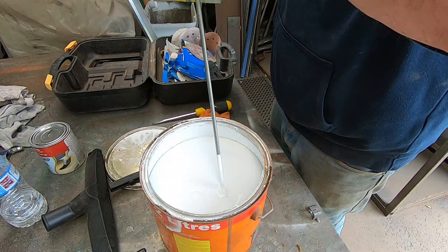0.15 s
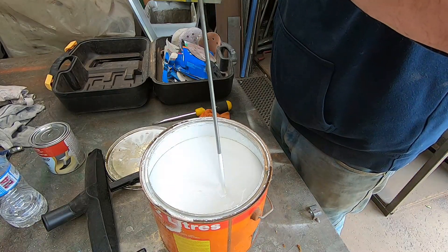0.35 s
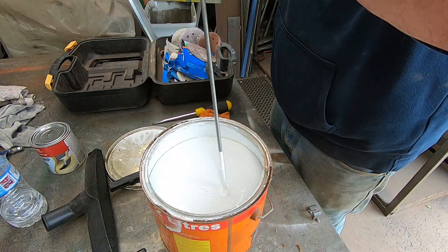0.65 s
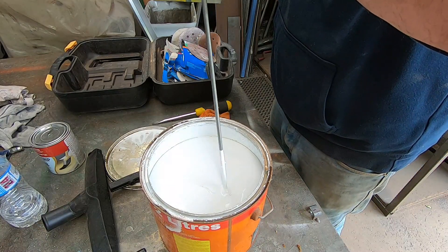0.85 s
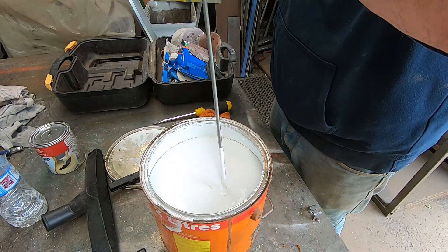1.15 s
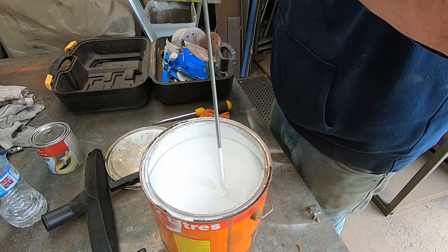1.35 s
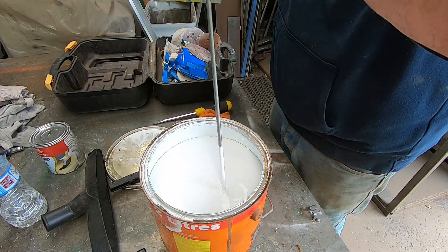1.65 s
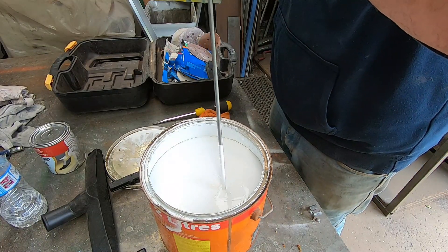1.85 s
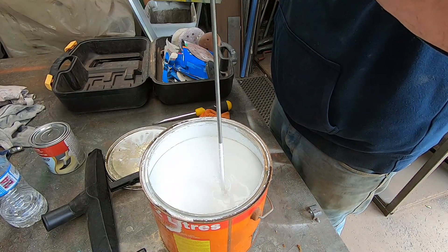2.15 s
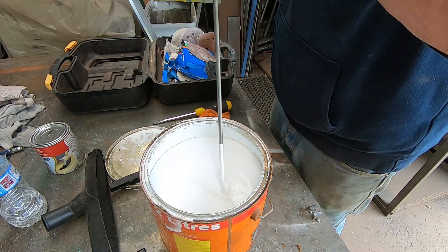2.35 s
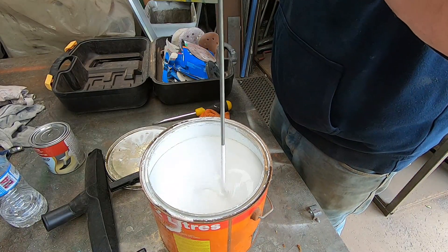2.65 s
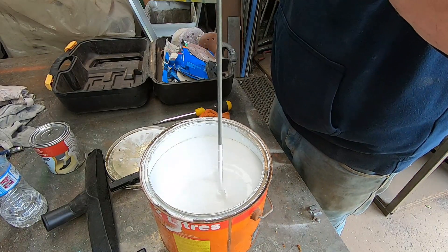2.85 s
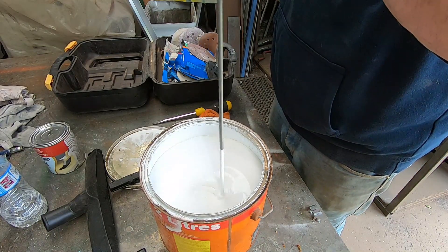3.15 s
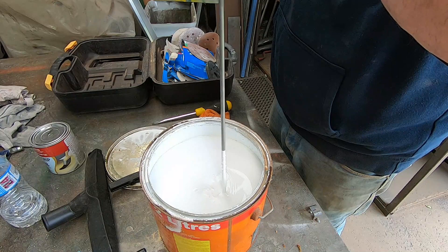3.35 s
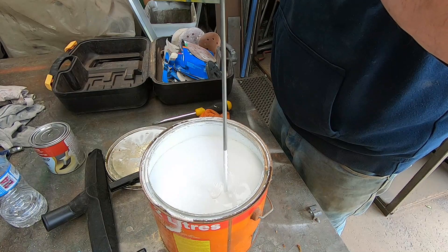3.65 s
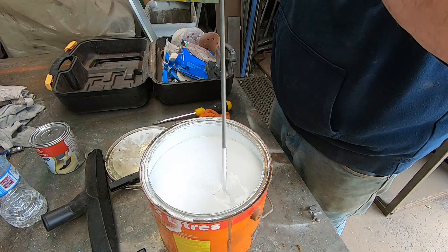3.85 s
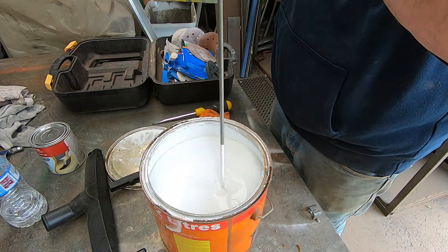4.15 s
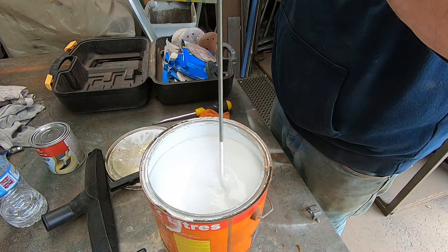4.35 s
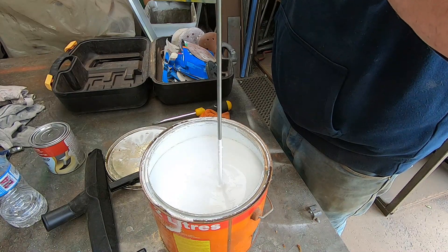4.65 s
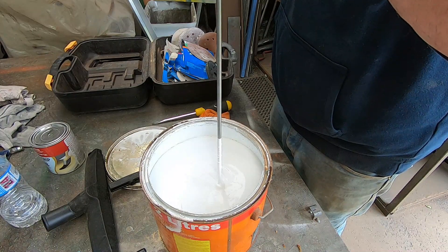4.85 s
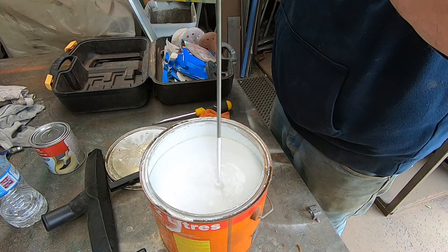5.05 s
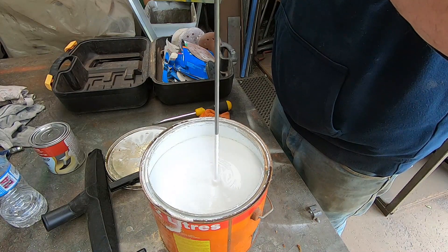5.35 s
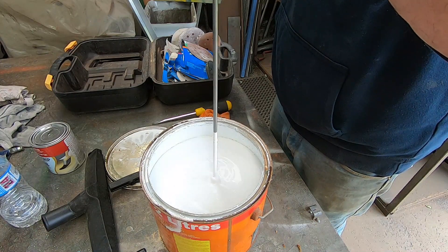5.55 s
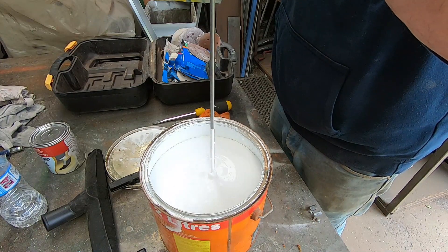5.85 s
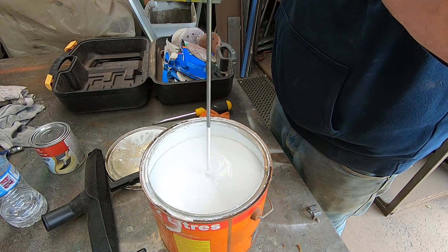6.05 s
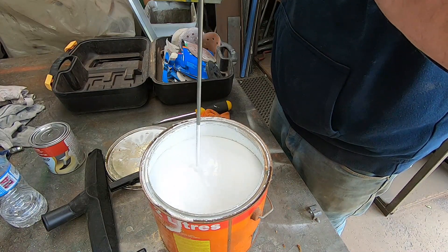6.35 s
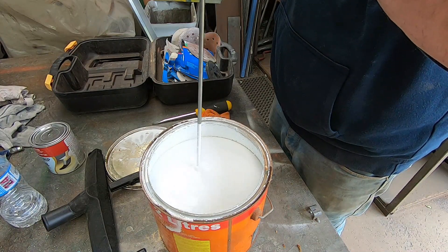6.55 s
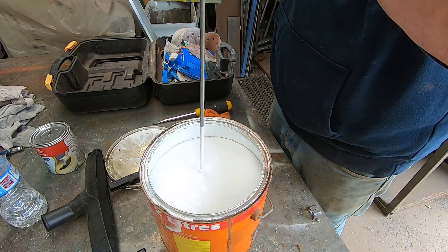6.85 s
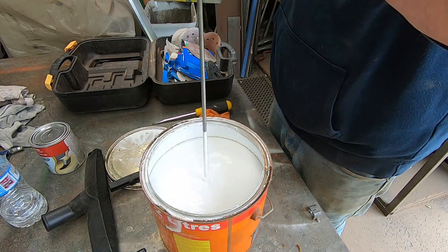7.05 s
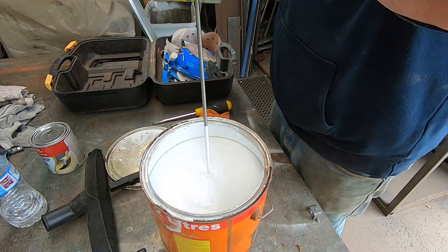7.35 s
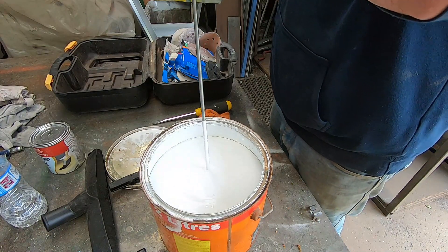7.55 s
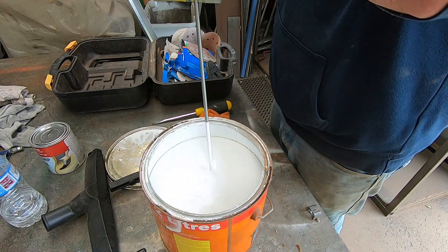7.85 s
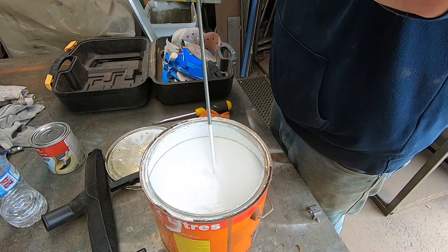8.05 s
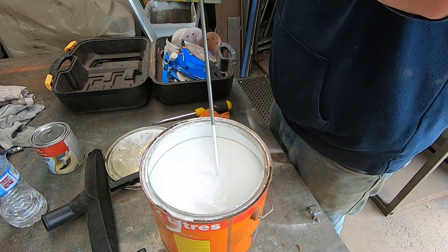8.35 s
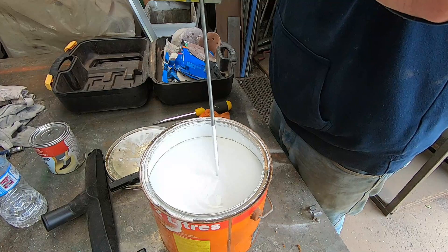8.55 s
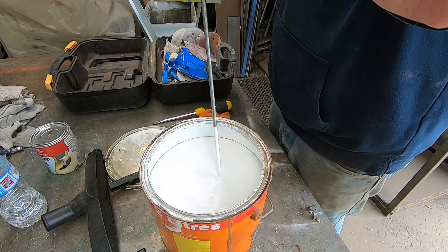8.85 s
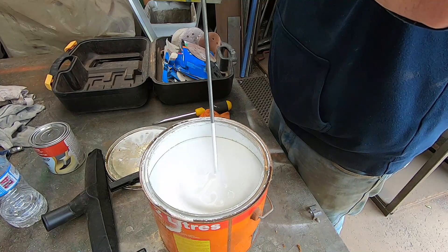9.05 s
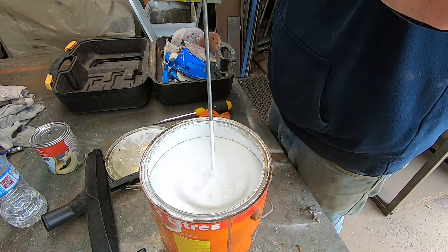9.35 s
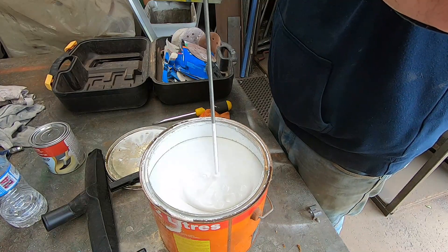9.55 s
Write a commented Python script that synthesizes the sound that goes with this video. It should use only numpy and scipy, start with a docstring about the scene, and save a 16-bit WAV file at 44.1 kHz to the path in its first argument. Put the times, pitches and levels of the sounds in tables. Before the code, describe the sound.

Close to the microphone, an electric drill spins a paddle in a tin of paint, its gritty gear noise and high whine almost unchanging for nearly nine seconds. The trigger is released, the pitch drops abruptly and gears clack to rest. Paint slops faintly, a distant bird gives one falling call, then the drill knocks and spins up again in a lightly echoing workshop.

```python
"""An electric drill, close to the microphone, spins a paddle in a tin of paint on a workshop bench.
Gears and brushes grind as noise shaped by the housing; tones at multiples of the rotor speed whine.
The trigger is let go, the paint brakes the motor and the gears clack to rest as clicks in ringing modes.
In the lull a far bird gives one falling call of two gliding sines; then the speed control sings
and the drill starts again, with a sharp knock as the slack is taken up. Still air hisses behind it all."""
import sys
import numpy as np
from scipy import signal
from scipy.fft import rfft, irfft, next_fast_len
from scipy.io import wavfile
from scipy.ndimage import uniform_filter1d

SR = 44100
rng = np.random.default_rng(int(sys.argv[2]) if len(sys.argv) > 2 else 0)


def bounce(signal):
    """Save signal as a 16-bit WAV file at the path given by the first command-line argument."""
    frames = np.transpose(np.atleast_2d(signal))
    limited = np.clip(frames, -1, 1)
    pcm = np.round(limited * 32767).astype(np.int16)
    wavfile.write(sys.argv[1], SR, pcm)


N = 427769
TIME = np.arange(N) / SR
PADDED = next_fast_len(N + SR // 4, True)
FREQS = np.maximum(np.fft.rfftfreq(PADDED, 1 / SR), 1)


def from_db(db):
    """Decibels to gain."""
    return np.exp(np.log(10) / 20 * np.asarray(db))


def rms_one(x):
    """Scale to unit power."""
    return x / np.sqrt(np.mean(x ** 2) + 1e-20)


def in_time(rows):
    """Each column of a curve at every sample."""
    s, *columns = np.transpose(rows)
    return [np.interp(TIME, s, column) for column in columns]


def in_frequency(rows):
    """Each column of a spectrum at every frequency, interpolated along log frequency."""
    hz, *columns = np.transpose(rows)
    return [np.interp(np.log(FREQS), np.log(hz), column) for column in columns]


def since(s):
    """Seconds gone by since a moment, zero before it."""
    return np.maximum(TIME - s, 0)


def swell(s, attack_s):
    """A straight rise from silence to full strength."""
    return np.minimum(since(s) / attack_s, 1)


def hump(s, peak_after_s):
    """A smooth swelling to full strength that ebbs more slowly."""
    stage = since(s) / peak_after_s
    return (stage * np.exp(1 - stage)) ** 2


def drift(rate_hz):
    """Random wander with spread 1: straight lines between fresh values, rate_hz of them a second."""
    knots = rng.standard_normal(4000)
    return rms_one(np.interp(TIME * np.clip(rate_hz, .1, 400), np.arange(len(knots)), knots))


def angle(hz):
    """Radians turned at a changing rate."""
    return 2 * np.pi * np.cumsum(hz) / SR


def filtered(x, response):
    """Pass a signal through a frequency response."""
    return irfft(rfft(x, PADDED) * response, PADDED)[..., :N]


def coloured(spectrum, shared):
    """Stereo noise of unit power with a part common to both sides."""
    noise = rng.standard_normal((2, N)) + shared * rng.standard_normal(N)
    return rms_one(filtered(noise, from_db(in_frequency(spectrum)[0])))


def ring(x, hz, t60):
    """A unit click sets a sine of height 1 ringing, 60 dB down after t60 seconds."""
    radius = np.exp(-np.log(1000) / (t60 * SR))
    turn = 2 * np.pi * hz / SR
    # the tiny offset keeps the filter away from vanishing numbers
    return signal.lfilter([0, np.sin(turn)], [1, -2 * radius * np.cos(turn), radius ** 2], x + 1e-18)


def sing(hz, width_hz):
    """Rubbing noise through two equal resonators in a row, each width_hz wide; unit power."""
    t60 = np.log(1000) / (np.pi * width_hz)
    return rms_one(ring(ring(rng.standard_normal(N), hz, t60), hz, t60))


def wandering(hz, stray_hz, flicker_hz=12, stray_rate_hz=1.5):
    """A narrow rubbing note whose centre strays; unit power."""
    phase = angle(hz + stray_hz * drift(stray_rate_hz))
    return rms_one(drift(flicker_hz) * np.sin(phase) + drift(flicker_hz) * np.cos(phase))


def tone(phase, pan_db, flutter, flutter_hz=45, lead=0):
    """A machine tone, left leading by some radians; the shaking tool flutters it differently at each port."""
    sides = []
    for side_phase, side_db in ((phase + lead, pan_db / 2), (phase, -pan_db / 2)):
        steady = np.sin(side_phase) * (1 + flutter * drift(flutter_hz))
        quadrature = flutter * drift(flutter_hz) * np.cos(side_phase)
        sides.append(rms_one(steady + quadrature) * from_db(side_db))
    return np.array(sides)


# trigger let go; the paint's drag alone would halve the speed in BRAKE_S, dry friction brings it to rest
RELEASE_S, BRAKE_S, FRICTION_HZ_PER_S = 8.754, .12, 25
# trigger pulled again: speed grows as a power of time; the gears bite once the slack is taken up
RESTART_S, RUN_UP_S, RUN_UP_POWER, BITE_S = 9.51, .566, .4, 9.565
# rotor speed at first, and how it creeps up as the paint thins
RUN_HZ, CREEP_HZ_PER_S = 358.5, .45
# the paddle bites into thick paint once and the speed sags: start, depth, sinking time
SAG_S, SAG_HZ, SAG_SINK_S = 2.42, 1.7, .25


def motor():
    """Rotor speed in Hz and as a share of full speed: it runs, is braked by the paint, and runs up again."""
    full_hz = RUN_HZ + CREEP_HZ_PER_S * TIME - SAG_HZ * hump(SAG_S, SAG_SINK_S)
    coasting = since(RELEASE_S)
    braked = 1 / (1 + (coasting / BRAKE_S) ** 3)
    slowing = np.maximum(braked - FRICTION_HZ_PER_S * coasting / full_hz, 0)
    share = slowing + swell(RESTART_S, RUN_UP_S) ** RUN_UP_POWER
    return full_hz * share, share


# colour of the housing: freq_hz, gain_db (only its shape counts)
HOUSING = [(110, -51), (170, -37.5), (320, -29.5), (620, -23.5), (1080, -12), (1600, -14.5), (2000, -10.5),
           (2600, -7), (3000, -1.8), (3400, -1.6), (3950, -7.5), (6100, -14.5), (7200, -8), (8300, -16.5),
           (10200, -16), (11400, -28), (14000, -33.5), (15000, -50)]
# narrow resonances that the rubbing keeps singing: freq_hz, width_hz, level_db (against the grinding)
SINGING = [(381, 6, -36), (457, 40, -37.5), (1060, 90, -27), (3300, 60, -19), (3680, 60, -23),
           (7325, 60, -28)]
# rubbing notes that stray in pitch: pitch_hz, spread_hz, level_db (against the grinding)
WANDERING = [(3035, 22, -19), (3200, 14, -20), (3465, 25, -21)]


def grinding(rotor, mesh_depth=.25, grit_db=-11, wobble_db=.4, gear_ratio=19):
    """Brush hiss and tooth impacts, bunched at each mesh of the four-tooth pinion, sound through the housing."""
    mesh = 4 * rotor
    teeth = np.diff(np.floor(mesh / (2 * np.pi)), prepend=0) * rng.standard_normal(N)
    hiss = rng.standard_normal(N) * (1 + mesh_depth * np.cos(mesh))
    source = hiss + from_db(grit_db) * rms_one(teeth)
    body = rms_one(filtered(source, from_db(in_frequency(HOUSING)[0])))
    body += sum(from_db(db) * sing(hz, width) for hz, width, db in SINGING)
    body += sum(from_db(db) * wandering(hz, stray_hz) for hz, stray_hz, db in WANDERING)
    # the bent shaft loads the gears once per turn of the chuck
    return body * from_db(wobble_db * np.sin(rotor / gear_ratio) + 0.4 * drift(40))


# the treble above SOFT_HZ dies with this power of speed
SOFT_HZ, SOFT_POWER = 8500, 2.6


def softened(x, share):
    """A slow machine loses its highest treble."""
    dull = filtered(x, 1 / (1 + (FREQS / SOFT_HZ) ** 12))
    return dull + share ** SOFT_POWER * (x - dull)


# tones of the rotor and gears: multiple of rotor speed, then against the grinding
# steady_db, braking_db, speeding_up_db; last left_right_db
ORDERS = [(1, -31.5, -41, -23, 2.5), (2, -39, -30, -23, 1), (3, -46, -28, -13.5, 2),
          (4, -15, -17, -15.5, 2), (5, -44, -21, -20, 1), (6, -28, -3.5, -18, 12), (7, -26, -22, -21, 3),
          (8, -16, -12, -22, 5), (10, -40, -4.5, -26, 4), (12, -20, -11.5, -28, 2), (14, -42, -10, -28, 2),
          (16, -31.5, -16, -28, 3)]
# mesh tone and its octave swell and sink as the drill is leaned on: time_s, mesh_db, octave_db
# (each heard as its departure from its own mean)
MESH = [(0.0, -60, -59), (0.24, -61, -59), (0.97, -57.5, -60), (2.4, -57, -60), (2.91, -61, -53.5),
        (3.13, -58, -53), (5.94, -59, -54), (6.98, -62, -55), (7.34, -58, -54.5), (7.66, -57, -57),
        (8.65, -57, -55), (8.7, -60, -56)]


def gear_tones(rotor, speed, flutter=.17, chatter=.45, chatter_hz=170):
    """Braking puts the gears on their other flanks, so other orders stand out; after release they chatter."""
    change = uniform_filter1d(np.gradient(speed) * SR, size=400)   # Hz per second
    # slow teeth touch too softly to sing, sooner so when no power drives them
    unpowered_db = np.interp(speed, [110, 275], [-45, 0])
    powered_db = np.interp(speed, [80, 180], [-45, 0])
    soft_db = np.where(change < 0, unpowered_db, powered_db)
    leaning = {order: db - db.mean() for order, db in zip((4, 8), in_time(MESH))}
    out = 0
    for order, steady_db, braking_db, rising_db, pan_db in ORDERS:
        level_db = np.interp(change, [-1100, 0, 500], [braking_db, steady_db, rising_db])
        level_db = level_db + leaning.get(order, 0)
        rough = 1 + chatter * (TIME > RELEASE_S) * drift(chatter_hz)
        out = out + from_db(level_db + soft_db) * rough * tone(order * rotor, pan_db, flutter)
    return out


SLOTS, FAN_BLADES = 16, 23
# the cooling fan's whine, and how far it wanders as the drill is moved
FAN_DB, FAN_WANDER_DB = -63.3, 1.5
# slot whine, swelling and shifting from side to side as the drill is moved about:
# time_s, level_db (at full speed), left_right_db
WHINE = [(0, -48, 4.5), (0.22, -46.5, 2.0), (1.55, -46.5, 2.0), (1.85, -47.5, 7.5), (2.5, -45.5, 3.5),
         (2.8, -43.0, -0.5), (3.08, -47.0, -2.5), (3.4, -45.0, -1.5), (4.2, -44.0, -0.5), (4.6, -46.0, 2.0),
         (6.0, -46.5, 3.5), (6.4, -45.0, -1.0), (7.2, -47.0, 1.5), (7.45, -59, 2.5), (8.2, -61, 3),
         (8.6, -55.5, 4.5)]


def rotor_whine(rotor, share, fade_db=145):
    """Slots sweep past the poles and fan blades past the vents; both whines die as the speed drops."""
    slot_db, pan_db = in_time(WHINE)
    slots = from_db(slot_db) * tone(SLOTS * rotor, pan_db, flutter=0.13, lead=1.3)
    fan_db = FAN_DB + FAN_WANDER_DB * drift(1.2)
    blades = from_db(fan_db) * tone(FAN_BLADES * rotor, pan_db=3, flutter=0.29, flutter_hz=69.8)
    return from_db(-fade_db * (1 - share)) * (slots + blades)


BEARING_RATIO = 9.183   # multiple of the rotor speed
# bearing tone as the load on the shaft shifts: time_s, level_db (at full speed)
BEARING = [(0, -58), (.6, -51), (1.8, -49), (2.5, -51), (3.3, -51), (4.1, -56), (5.6, -52.5), (6.6, -56),
           (8.7, -58)]


def bearing(rotor, share, fade_db=60):
    """Balls rolling over the race give a thin, wavering tone that follows the rotor and dies as it slows."""
    level_db, = in_time(BEARING)
    thin = tone(BEARING_RATIO * rotor, pan_db=6, flutter=.4, flutter_hz=14)
    return from_db(level_db - fade_db * (1 - share)) * thin


# colour of the air leaving the vents: freq_hz, gain_db (only its shape counts)
VENTS = [(200, -36), (700, -9), (2000, 5), (3200, -11), (5000, 6), (7200, 0), (8300, -5), (10200, -7),
         (11400, -12), (14000, -22), (15000, -28)]
# its level as the drill is turned about: time_s, level_db (against the grinding)
VENTS_LEVEL = [(0, -9), (2, -8.5), (2.8, -7.3), (4.5, -7.8), (6.9, -8), (7.6, -10), (8.7, -10)]


def vent_air(share):
    """Air rushing from the vents: noise unrelated on the two sides, duller as the machine slows."""
    return from_db(in_time(VENTS_LEVEL)[0]) * softened(coloured(VENTS, shared=0), share)


# resonances of the housing that strained gears set singing: freq_hz, width_hz, level_db (before JUDDER_DB)
STRAIN_RINGS = [(3100, 1000, -37), (4900, 700, -47)]
JUDDER_DB = -3   # added to all of them


def straining(share, slack_db=-9, judder_db=2.2, judder_hz=160, ease_power=.4):
    """Pulling up to speed, juddering gears set the housing singing, faintly until the slack is gone."""
    lag = np.maximum(1 - share, 0) ** ease_power
    pull = swell(RESTART_S, attack_s=.02) * lag * from_db(slack_db * (TIME < BITE_S))
    rings = sum(from_db(db) * sing(hz, width) for hz, width, db in STRAIN_RINGS)
    return pull * rings * from_db(JUDDER_DB + judder_db * drift(judder_hz))


# clacks of gears, trigger and paddle shaft: start_s, peak_db (before the room),
# tin_db (tin's modes against the housing's), rattle_t60_s, contact_hz (brightness), crack_db (steel)
KNOCKS = [(8.8401, -19.5, 0, .012, 11500, 24), (8.869, -28, -10, .022, 12500, 21),
          (8.8735, -26, -8, .006, 12500, 22), (8.8749, -25, -5, .012, 8000, 12),
          (8.8784, -29, -9, .014, 9000, 12), (8.892, -28, -4, .02, 12000, 21),
          (9.066, -41, 3, .008, 8000, 17), (9.434, -53, 0, .05, 9000, 16), (9.5123, -33, -18, .02, 3500, 8),
          (9.5158, -24, -21, .014, 2600, 0), (9.524, -32, 4, .03, 7000, 12),
          (9.5605, -34, -8, .01, 4000, 10), (9.5643, -27, -2, .004, 8000, 15),
          (9.5652, -12.3, 11.5, .0006, 10000, 19), (9.5665, -15.5, -1, .002, 8000, 14),
          (9.5678, -15, -6, .003, 6000, 12), (9.581, -30, -6, .012, 2800, 0),
          (9.5848, -28, -6, .012, 2800, 0)]
# what they ring with: freq_hz, level_db (relative), t60_s; the modes under TIN_TOP_HZ belong to the tin
MODES = [(200, -47, .055), (580, -20, .012), (1220, -2, .006), (1680, -1, .005), (2150, -6, .003),
         (2650, -1, .0055), (3250, 3, .008), (3860, -11, .04), (4600, -4, .003), (5700, -3, .003),
         (6800, -5, .003), (7900, -6, .003), (9550, -5, .004), (10500, -12, .003)]
TIN_TOP_HZ = 2000
CRACK_LOW_HZ, CRACK_HIGH_HZ = 4700, 7500   # band of the steel crack


def knocks(rattle=0.32):
    """Each blow is a click and a dying rattle into the modes of housing and tin; soft contacts are duller."""
    out = np.zeros(N + SR)
    age = TIME[:SR // 8]
    steel = signal.butter(1, [CRACK_LOW_HZ, CRACK_HIGH_HZ], "band", fs=SR, output="sos")
    for s, peak_db, tin_db, t60, contact_hz, crack_db in KNOCKS:
        force = rattle * rng.standard_normal(len(age)) * np.exp(-np.log(1000) * age / t60)
        force[0] += 1
        # steel on steel adds a bright crack
        blow = from_db(crack_db) * signal.sosfilt(steel, force)
        for k, (hz, db, decay) in enumerate(MODES):
            mode_db = db + tin_db * (hz < TIN_TOP_HZ)
            blow = blow + (-1) ** k * from_db(mode_db) * ring(force, hz, decay)
        contact = signal.butter(2, min(contact_hz, .45 * SR), fs=SR, output="sos")
        blow = signal.sosfilt(contact, blow)
        start = round(s * SR)
        out[start:start + len(age)] += from_db(peak_db) * blow / np.abs(blow).max()
    return out[:N]


# the speed control sings from the first squeeze of the trigger until the rotor turns
SQUEEZE_S, SWITCHING_HZ, SWITCHING_DB = 9.35, 1996, -71.5
# its fourth harmonic swells while the motor gathers speed
OVERTONE_DB, OVERTONE_ATTACK_S = -51, .15


def speed_control(rotor, lower_db=-5.5, waver=.018, smear=.75):
    """Chopped current makes the windings sing; the turning rotor splits the overtone into two side tones."""
    stalled = swell(SQUEEZE_S, RESTART_S - SQUEEZE_S) * (1 - swell(RESTART_S, attack_s=.015))
    switching = np.sqrt(2) * np.sin(angle(SWITCHING_HZ * (1 + waver * drift(200))))
    carrier = 4 * (2 * np.pi * SWITCHING_HZ * TIME) + smear * drift(400)
    upper = tone(carrier + rotor, pan_db=4, flutter=0.34)
    lower = from_db(lower_db) * tone(carrier - rotor, pan_db=4, flutter=.2)
    overtone = from_db(OVERTONE_DB) * swell(RESTART_S, OVERTONE_ATTACK_S) * (upper + lower)
    return from_db(SWITCHING_DB) * stalled * switching + overtone


# low gulps of the paint around the paddle: start_s, peak_db, swelling_s
GULPS = [(2.3, -70.5, .1), (3.15, -80, .3), (7.05, -75, .11), (8.858, -66, .018), (9.03, -76, .4)]
# colour of the paint slopping back once the paddle is still: freq_hz, gain_db (only its shape counts)
SLOP = [(120, -11), (350, -13), (1300, -3), (2300, 0), (3300, 6.5), (4500, -4), (7000, -9), (9000, -31),
        (14000, -40)]
SLOP_S, SLOP_DB, SLOP_T60_S = 9.0655, -49.5, .47   # start, level, dying time


def paint():
    """The paddle churns low in the tin, gulps swelling and ebbing; then the swirl slops back, a dying hiss."""
    gulps = sum(from_db(peak_db) * hump(s, swell_s) for s, peak_db, swell_s in GULPS)
    churn = gulps * sing(225, width_hz=170)
    age = since(SLOP_S)
    slop_level = (age > 0) * from_db(SLOP_DB - 60 * age / SLOP_T60_S)
    return churn + slop_level * coloured(SLOP, shared=0.9)


def echoes(x, t60, dull_hz):
    """Dense reflections, unrelated on the two sides, dying away and duller than the direct sound."""
    # the first one comes after 3 ms
    tail = rng.standard_normal((2, SR)) * from_db(-60 * TIME[:SR] / t60) * (TIME[:SR] > .003)
    tail /= np.sqrt(np.sum(tail ** 2, axis=1, keepdims=True))
    pole = np.exp(-2 * np.pi * dull_hz / SR)
    return signal.lfilter([1 - pole], [1, -pole], signal.fftconvolve(x[None], tail, axes=1)[:, :N])


# the two microphone ports: freq_hz, left_right_db, left_lead_rad
PORTS = [(160, 0, 0), (440, 1.5, .1), (730, 7.5, .2), (1200, 4.5, -.5), (2100, 5.8, -.55), (3270, 6.5, -.2),
         (4400, 2, .3), (6000, .5, 1.3), (7300, 1.5, 2), (9400, 7.5, 2.7), (14000, 10, 3.6)]
ROOM_T60_S, ROOM_DB = .42, -11


def at_ports(x):
    """Direct sound reaches the two ports out of step; the workshop adds its echoes."""
    balance_db, lead = in_frequency(PORTS)
    side = np.array([[.5], [-.5]])
    direct = filtered(x, np.exp(1j * side * lead))
    heard = direct + from_db(ROOM_DB) * echoes(x, ROOM_T60_S, dull_hz=9200)
    return filtered(heard, from_db(side * balance_db))


def chirp(s, length_s, from_hz, to_hz, waver=.03, waver_hz=250):
    """A whistled note that swells and fades while it falls in pitch."""
    stage = np.clip(since(s) / length_s, 0, 1)
    hz = from_hz * (to_hz / from_hz) ** stage
    return 3 * np.sqrt(stage * (1 - stage)) * np.sin(angle(hz * (1 + waver * drift(waver_hz))))


# the two slurred notes of the call: start_s, length_s, first_pitch_hz, last_pitch_hz,
# level_db (gain on the note before the distance)
BIRD = [(9.26, .06, 5150, 3500, -57.5), (9.307, .074, 4550, 3000, -53.5)]


def bird():
    """A far bird's falling call reaches the microphone mostly as echoes, with a weaker direct sound."""
    call = sum(from_db(db) * chirp(*note) for *note, db in BIRD)
    direct = from_db([[-14], [-8]]) * call   # left, right
    return echoes(call, t60=.5, dull_hz=9000) + direct


# colour of the workshop background: freq_hz, gain_db (only its shape counts)
AIR = [(28, -13), (55, -12), (100, -22), (180, 0), (330, -8), (750, -1.5), (1500, -10), (4000, -5),
       (8000, -18), (14000, -42)]
AIR_DB = -72


def still_air():
    """Steady coloured noise, partly shared by the two sides."""
    return from_db(AIR_DB) * coloured(AIR, shared=0.51)


# grinding at full speed, the power of speed that it follows, and what full strain adds to it
GRIND_DB, GRIND_POWER, STRAIN_DB = -40.9, .95, 10


def scene():
    """The drill and tin close by, the bird far off, still air behind them."""
    speed, share = motor()
    rotor = angle(speed)
    # the gears are strained by as much as the rotor lags behind full speed
    strain = (TIME > BITE_S) * (1 - share)
    running = from_db(GRIND_DB) * share ** GRIND_POWER
    grind = running * from_db(STRAIN_DB * strain)
    drill = at_ports(grind * softened(grinding(rotor), share) + straining(share) + knocks())
    whine = grind * gear_tones(rotor, speed) + rotor_whine(rotor, share)
    whine = whine + bearing(rotor, share) + speed_control(rotor)
    near = drill + whine + running * vent_air(share) + paint()
    # tool and tin are too small to radiate bass
    small = signal.butter(6, 140, "high", fs=SR, output="sos")
    return signal.sosfilt(small, near) + bird() + still_air()


CUTOFF_HZ = 15000


def record(dry):
    """The top is cut steeply."""
    return signal.sosfilt(signal.ellip(10, .2, 80, CUTOFF_HZ, fs=SR, output="sos"), dry)


dry = scene()
out = record(dry)
bounce(out)
```